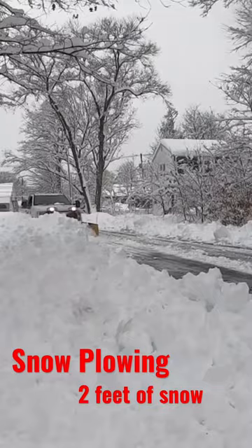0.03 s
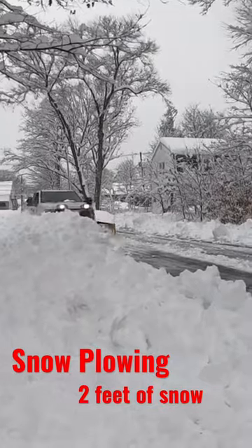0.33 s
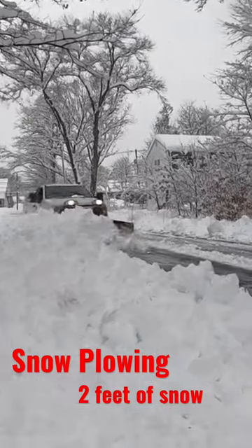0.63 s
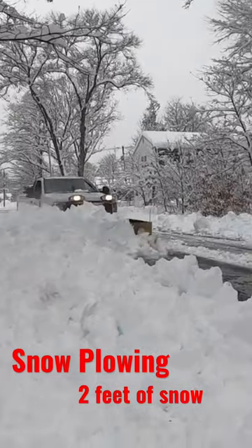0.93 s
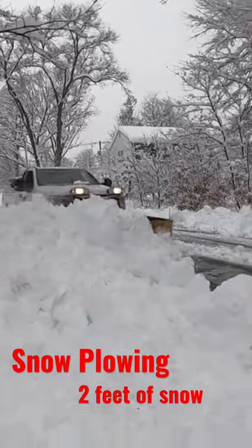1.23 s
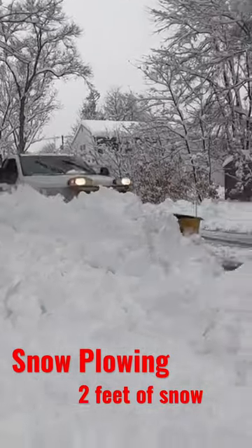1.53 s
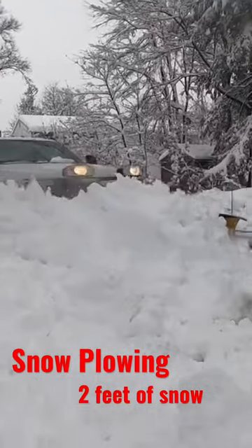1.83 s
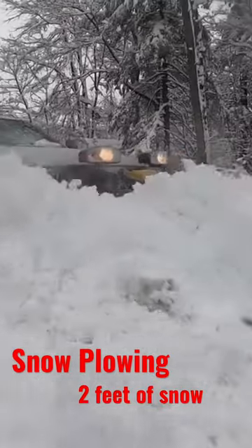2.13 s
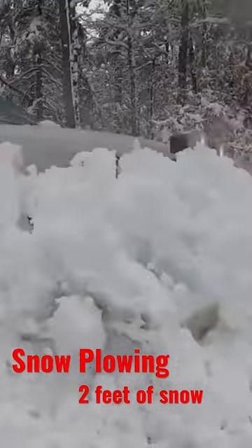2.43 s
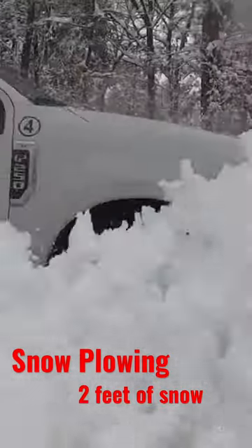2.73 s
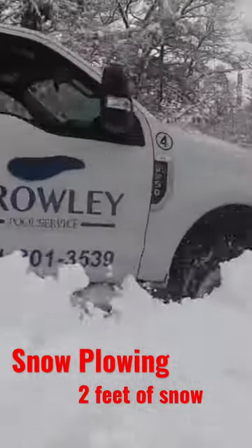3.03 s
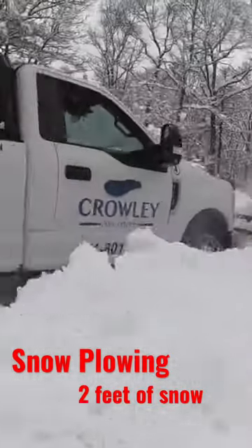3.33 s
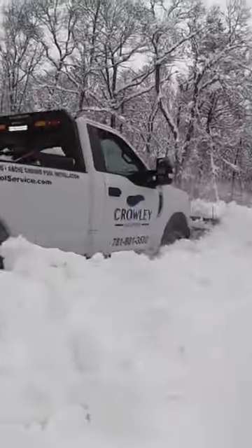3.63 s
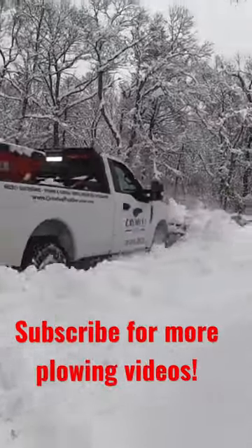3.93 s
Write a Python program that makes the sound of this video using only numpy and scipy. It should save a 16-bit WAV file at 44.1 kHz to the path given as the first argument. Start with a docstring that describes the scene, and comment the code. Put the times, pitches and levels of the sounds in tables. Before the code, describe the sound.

A pickup with a snow plow approaches slowly, its engine burbling louder. The blade knocks, clods of snow thud down near the microphone, then the truck passes close with slushy tyre hiss and a chuffing exhaust.

```python
"""A snow plow passes

A V8 pickup with a plow blade drives slowly past, close by, on a snowy road. Its exhaust burbles
and, once the tailpipe faces the listener, chuffs on every engine cycle; the engine bay rushes.
The blade knocks, pushes a puff of air and throws clods of snow that thud onto the bank.
The tyres hiss through slush, bits of ice crack, and metal rings under the truck."""
import sys
import numpy as np
from scipy import signal
from scipy.io import wavfile

SR = 44100
rng = np.random.default_rng(int(sys.argv[2]) if len(sys.argv) > 2 else 0)


def to_wav(sig):
    """Store sig (one row per channel, or 1-D mono) as 16-bit WAV at the path in sys.argv[1].

    Samples outside -1..1 are clipped; the rate is SR.
    """
    pcm = np.clip(np.atleast_2d(sig), -1, 1) * 32767
    pcm = np.round(pcm).astype(np.int16)
    wavfile.write(sys.argv[1], SR, pcm.T)  # frames by channels


N = 176400
T = np.arange(N) / SR

# How alike the two ears hear the noises. Each row: pitch in Hz, likeness from 0 to 1.
LIKENESS = [(60, 0.78), (300, 1), (1000, 0.61), (2200, 0.75), (4000, 1), (7000, 0.13), (14000, 0)]
# Echoes off road, truck and snow bank. Each row: delay in seconds, level in dB.
ECHOES = [(.0017, -30.5), (.0046, -29.5), (.0083, -19), (0.0138, -21)]
# The tone colour of six noises. Each row: pitch in Hz, relative level in dB.
RUMBLE_SPECTRUM = [(20, -17), (40, -0.5), (80, -2), (130, -3.5), (200, -14), (300, -13.5), (480, -24),
                   (1000, -65.5)]
SLUSH_SPECTRUM = [(500, 0), (1500, -19.5), (3000, -3.5), (5000, -1.5), (8400, -1.5), (9500, -6.5),
                  (12500, -15.5), (15000, -21.5)]
BAY_SPECTRUM = [(150, 9.5), (300, 7.5), (600, 2.5), (1000, 3.5), (1400, 0.5), (2000, 1), (3300, -2.5),
                (4100, -13), (8200, -16), (9500, -46), (15000, -58.5)]
GUST_SPECTRUM = [(20, -13), (45, 0), (110, -5.5), (190, -8.5), (300, -19.5), (600, -55), (2000, -66)]
SCRAPE_SPECTRUM = [(200, -1), (480, 7), (750, -3.5), (1500, -12), (3300, -12.5), (5000, -38)]
CRUMBLE_SPECTRUM = [(120, -10.5), (280, 6), (480, 4), (750, -1.5), (1150, -8.5), (1700, -17.5), (3000, -18),
                    (6000, -32), (14000, -71)]
# The rumble of blade and wheels. Each row: time in seconds, level in dB.
RUMBLE_LEVELS = [(0, -46), (1.1, -43), (1.7, -38), (2.1, -32), (2.85, -28), (3.3, -32), (4.0, -34.5)]
# The truck going by. Each row: time in seconds, engine bay in dB, tyre hiss in dB.
PASS_LEVELS = [(0, -52, -80), (.6, -51.5, -68), (1.4, -47.5, -60), (1.9, -45.5, -59), (2.15, -43, -54.5),
               (2.36, -40.5, -48.5), (2.62, -43, -50.5), (2.86, -35.5, -45.5), (3.1, -38, -46.5),
               (3.45, -42, -56.5), (3.75, -43, -62.5), (4.0, -47.5, -64.5)]
# Where the engine bay is heard. Each row: time in seconds, left over right in dB.
BAY_PAN = [(0, -1), (2.0, 0.5), (2.5, -3.5), (3.1, 0.5), (3.6, 7), (4.0, 0.5)]
# Metal under the truck, each ring heard briefly as the side goes by. Each row: pitch in Hz,
# relative width, level in dB, loudest moment in seconds, spread in seconds.
UNDERBODY_RINGS = [(876, 92, -52.5, 3.45, 0.5), (1006, 95, -48, 3.74, 0.16), (1740, 130, -52, 3.7, 0.22),
                   (1952, 80, -50.5, 3.77, 0.11), (2880, 170, -50.5, 3.11, 0.078),
                   (3107, 190, -49, 3.74, 0.12)]
# Cracking ice. Each row: start in seconds, level in dB, pitch in Hz, filter width in Hz,
# left over right in dB, seconds to fade by 60 dB.
ICE_TICKS = [(.053, -45, 7600, 4000, -6, .012), (0.075, -39.5, 7000, 3000, 21, 0.015),
             (0.66, -49, 7860, 3500, -8, .016), (0.713, -38.5, 4370, 3200, -3, 0.0092),
             (.894, -32, 1840, 1100, -1, 0.0051), (0.894, -47, 8800, 3000, -3, 0.0064),
             (2.405, -28.5, 8280, 7100, -12, 0.015), (3.369, -26, 2300, 3200, -1, 0.038)]
# The blade knocks in its frame. Each row: start in seconds, level in dB.
BLADE_KNOCKS = [(1.262, -37), (1.376, -37), (1.835, -24), (1.899, -33.5)]
# How the blade rings. Each row: pitch in Hz, filter width in Hz, relative level in dB.
BLADE_RINGS = [(517, 54, -7), (652, 110, -5.5), (825, 63, -19), (1214, 67, -13), (2600, 1300, -11)]
# Snow clods landing. Each row: start in seconds, relative level in dB, pitch in Hz.
CLODS = [(2.056, -31, 510), (2.082, -29, 634), (2.118, -29.5, 720), (2.136, -31, 517), (2.191, -32, 360),
         (2.212, -25, 483), (2.238, -30, 543), (2.256, -25.5, 465), (2.273, -28, 630), (2.301, -20.5, 480),
         (2.314, -28, 452), (2.328, -22.5, 447), (2.346, -23.5, 460), (2.377, -27, 490), (2.402, -35, 770),
         (2.434, -25, 500), (2.500, -27.5, 240), (2.528, -28.5, 567), (2.564, -27, 398),
         (2.588, -27.5, 564), (2.676, -28.5, 374)]
# Engine speed. Each row: time in seconds, four-stroke cycles per second.
ENGINE_SPEED = [(0.0, 15.29), (0.6, 15.56), (1.3, 15.8), (1.85, 16.01), (2.2, 16.22), (2.7, 16.01),
                (3.35, 15.73), (4.0, 15.17)]
# Tones from the two cylinder banks firing unevenly. Each row: multiple of the cycle rate, level in dB.
BURBLE_TONES = [(2, -19), (3, 0.5), (4, -24.5), (5, -1.5), (6, -12.5), (7, -15), (9, -17.5), (10, -33),
                (11, -20), (13, -29.5), (14, -27), (15, -25.5), (16, -35)]
# The exhaust mix. Each row: time in seconds, then burble, firing note and chuff levels in dB.
EXHAUST_LEVELS = [(0, -40.5, -41.5, -56), (1.0, -35.5, -43.5, -51.5), (1.4, -33, -42, -40.5),
                  (1.75, -32.5, -35, -44.5), (2.1, -30, -33.5, -41.5), (2.48, -25.5, -30, -36),
                  (2.64, -26, -40, -32.5), (2.95, -26, -24.5, -30.5), (3.1, -25, -28.5, -26.5),
                  (3.3, -23.5, -19, -24.5), (3.47, -23, -19.8, -24), (3.68, -23.5, -21, -20.5),
                  (4.0, -27, -22, -32)]
# Cylinders that ring the tailpipe. Each row: place in the cycle from 0 to 1, level in dB.
CYLINDERS = [(0, 0), (.5, -14)]
# How the tailpipe rings. Each row: pitch in Hz, filter width in Hz, relative level in dB.
PIPE_RINGS = [(229.3, 39, -9.5), (337.9, 65.7, 2), (470.4, 44, -23)]

FIRINGS_PER_CYCLE, CHUFF_AT_S = 8, 3.615
HIT_ATTACK_S, SCRAPE_FADE_S, CRUMBLE_FADE_S = 0.0031, 0.34, 0.25
SCRAPE_DB, THUD_DB, OVERTONE_DB, CRUMBLE_DB, GUST_DB = -13, -5, -12, -8, -25.5
LEFT_DULL_HZ, CUTOFF_HZ = 8100, 15800
START_S, FADE_S = 0.035, 0.0041


def from_db(db):
    """Turn decibels into a gain."""
    return 10 ** (np.asarray(db) / 20)


def rms_one(x):
    """Scale a signal to an average power of 1."""
    return x / np.sqrt(np.mean(x ** 2) + 1e-20)


def in_time(rows):
    """Join a table's rows into curves over time, one per column of values."""
    times, *columns = np.transpose(rows)
    return [np.interp(T, times, column) for column in columns]


def at_hz(points, hz):
    """Read a table at one pitch, with the octaves evenly spaced."""
    pitches, values = np.transpose(points)
    return np.interp(np.log(hz), np.log(pitches), values)


def pan(db):
    """Left and right gains of constant power; positive dB leans left."""
    gains = from_db(np.array([[.5], [-.5]]) * db)
    return gains / np.sqrt(np.mean(gains ** 2, axis=0))


def drift(rate_hz):
    """A slow random wander, about 1 in size."""
    step, settle = 40, 2000  # samples per point, opening points to skip
    r = np.exp(-2 * np.pi * rate_hz * step / SR)
    slow = signal.lfilter([1], [1, -2 * r, r * r], rng.standard_normal(N // step + settle + 2))[settle:]
    return np.interp(np.arange(N) / step, np.arange(len(slow)), rms_one(slow))


def swell(at_s, spread_s):
    """A smooth rise and fall around one moment."""
    return np.exp(-.5 * ((T - at_s) / spread_s) ** 2)


def hit(start_s, attack_s, fade_s):
    """The loudness of a hit: a quick rise, then down 60 dB in fade_s."""
    age = T - start_s
    return np.clip(age / attack_s, 0, 1) * from_db(-60 * np.clip((age - attack_s) / fade_s, 0, 2))


def resonate(x, hz, width_hz, passes):
    """Make a signal ring at one pitch; each pass narrows the ring."""
    r = np.exp(-np.pi * width_hz / SR)
    feed = np.array([1, 0, -1]) * (1 - r * r) / 2
    feedback = [1, -2 * r * np.cos(2 * np.pi * hz / SR), r * r]
    for _ in range(passes):
        x = signal.lfilter(feed, feedback, x + 1e-18)
    return x


def knock(start_s, hz, width_hz):
    """A soft tap that rings at one pitch, with a peak of 1."""
    ring = resonate(signal.unit_impulse(N // 20), hz, width_hz, passes=2)
    return np.interp(T - start_s, T[:len(ring)], ring / np.abs(ring).max(), left=0, right=0)


def banded_noise(spectrum, flicker_db, likeness=LIKENESS):
    """Stereo noise of power 1, built from bands that each flicker in level."""
    edges = np.concatenate([np.geomspace(20, 2000, 15)[:-1], np.geomspace(2000, 16000, 15)])
    shared_flicker = drift(9.5)
    white = rng.standard_normal((2, 2, N))  # neighbouring bands use different noise
    out = 0
    for k, (low, high) in enumerate(zip(edges, edges[1:])):
        if low > spectrum[-1][0]:
            break
        band = signal.butter(2, [low, high], "band", fs=SR, output="sos")
        mid, side = signal.sosfilt(band, white[k % 2])
        hz = np.sqrt(low * high)
        alike = at_hz(likeness, hz)
        gain = from_db(at_hz(spectrum, hz) + flicker_db * (0.54 * shared_flicker + drift(14.6)))
        out += gain * (np.sqrt(1 + alike) * mid + np.sqrt(1 - alike) * side * [[1], [-1]])
    return rms_one(out)


def reflected(x):
    """Add short echoes from nearby surfaces, keeping the level."""
    out = x + sum(from_db(db) * np.roll(x, int(s * SR), axis=-1) * (T > s) for s, db in ECHOES)
    return out * np.std(x) / np.std(out)


def rush(cycles):
    """The engine bay throbs with the firings, tyres hiss in slush, and blade and wheels rumble."""
    bay_db, hiss_db = in_time(PASS_LEVELS)
    throb_db = np.cos(2 * np.pi * FIRINGS_PER_CYCLE * cycles)
    bay = from_db(bay_db + throb_db) * banded_noise(BAY_SPECTRUM, flicker_db=1)
    hiss = from_db(hiss_db) * banded_noise(SLUSH_SPECTRUM, flicker_db=1)
    rumble = from_db(in_time(RUMBLE_LEVELS)[0]) * banded_noise(RUMBLE_SPECTRUM, flicker_db=2.5)
    return bay * pan(in_time(BAY_PAN)[0]) + hiss * pan(db=1.5) + rumble


def underbody():
    """Metal under the truck is shaken at random; it rings more on the left once the cab has passed."""
    out = 0
    for hz, width, db, at_s, spread_s in UNDERBODY_RINGS:
        gain = from_db(db + drift(30)) * swell(at_s, spread_s)
        out += gain * rms_one(resonate(rng.standard_normal(N), hz, 0.74 * width, passes=2))
    return out * pan(db=np.interp(T, [3.2, 3.55], [0, 11.5]))


def ice_ticks():
    """Bits of ice crack in very short, bright bursts."""
    white = rng.standard_normal(N) + rng.standard_normal((2, N))  # partly shared by both ears
    out = 0
    for start_s, db, hz, width_hz, pan_db, fade_s in ICE_TICKS:
        crack = resonate(white * hit(start_s, 0.0013, fade_s), hz, width_hz, passes=3)
        out += from_db(db) * crack / np.abs(crack).max() * pan(pan_db)
    return out


def gust():
    """Air pushed ahead of the blade buffets the microphone, mostly on the left."""
    air = banded_noise(GUST_SPECTRUM, flicker_db=2.5, likeness=[(100, 0.19)])
    return from_db(GUST_DB) * swell(at_s=2.53, spread_s=0.14) * air * pan(db=10)


def blade():
    """The plow blade knocks in its frame and scrapes on briefly."""
    knocks = sum(from_db(db + ring_db) * knock(s, hz, width_hz)
                 for s, db in BLADE_KNOCKS for hz, width_hz, ring_db in BLADE_RINGS)
    drag = sum(from_db(db + SCRAPE_DB) * hit(s, HIT_ATTACK_S, SCRAPE_FADE_S) for s, db in BLADE_KNOCKS)
    return knocks + drag * banded_noise(SCRAPE_SPECTRUM, flicker_db=1)


def clods():
    """Each clod of snow lands with a hollow thud, a weaker overtone and a short crumble."""
    thuds, crumble_power = 0, 0
    for start_s, db, hz in CLODS:
        overtone = from_db(OVERTONE_DB) * knock(start_s, hz * rng.uniform(1.37, 2.54), width_hz=180)
        thuds += from_db(db + THUD_DB) * (knock(start_s, hz, width_hz=90) + overtone)
        crumble_power += (from_db(db + CRUMBLE_DB) * hit(start_s, HIT_ATTACK_S, CRUMBLE_FADE_S)) ** 2
    return thuds + np.sqrt(crumble_power) * banded_noise(CRUMBLE_SPECTRUM, flicker_db=2.5)


def engine_cycles():
    """Count the engine's cycles; the loudest cylinder fires at each whole number."""
    cycles = np.cumsum(in_time(ENGINE_SPEED)[0]) / SR
    return cycles - np.interp(CHUFF_AT_S, T, cycles)


def engine_tone(cycles, multiple, db):
    """One tone that follows the engine speed, wobbling a little in pitch and level."""
    phase = 2 * np.pi * (multiple * cycles + rng.random()) + 0.087 * drift(1.6)
    return np.sqrt(2) * from_db(db + 1.1 * drift(3)) * np.sin(phase)


def chuffs(cycles, level_db):
    """A strong and a weak pulse in every cycle make the tailpipe ring."""
    pulses, out = 0, 0
    for place, db in CYLINDERS:
        firings = np.floor(cycles - place)
        pulses += from_db(db) * np.diff(firings, prepend=firings[0])
    pulses *= from_db(0.7 * rng.standard_normal(N))  # each firing varies in strength
    for hz, width_hz, db in PIPE_RINGS:
        ring = resonate(pulses, hz, width_hz, passes=5)
        out += from_db(db + level_db) * ring / np.abs(ring).max()
    return out


def exhaust(cycles):
    """The eight cylinders make a firing note, their uneven banks burble, and the tailpipe chuffs."""
    burble_db, firing_db, chuff_db = in_time(EXHAUST_LEVELS)
    firing_note = engine_tone(cycles, FIRINGS_PER_CYCLE, firing_db)
    burble = sum(engine_tone(cycles, multiple, burble_db + db) for multiple, db in BURBLE_TONES)
    return firing_note + burble + chuffs(cycles, chuff_db)


def scene():
    """The truck and the snow that it moves."""
    cycles = engine_cycles()
    truck = exhaust(cycles) + reflected(rush(cycles)) + underbody() + blade()
    return truck + clods() + gust() + ice_ticks()


def record(dry):
    """Dull the left side, fade both ends quickly and cut the highest treble."""
    left, right = dry
    dull = signal.sosfiltfilt(signal.butter(2, LEFT_DULL_HZ, fs=SR, output="sos"), left)
    stereo = np.array([0.65 * dull + 0.35 * left, right])
    fade = np.clip(np.minimum(T - START_S, T[-1] - T) / FADE_S, 0, 1)
    return signal.sosfilt(signal.cheby2(16, 70, CUTOFF_HZ, fs=SR, output="sos"), stereo * fade)


dry = scene()
out = record(dry)
to_wav(out)
```